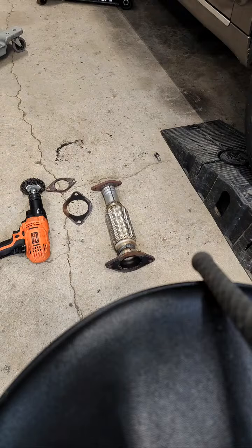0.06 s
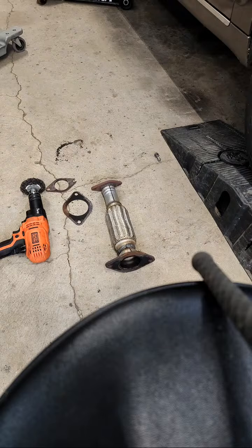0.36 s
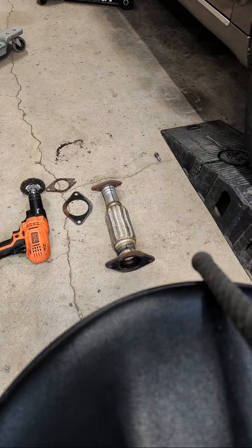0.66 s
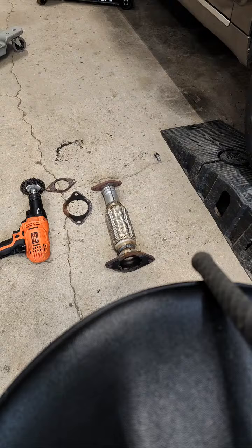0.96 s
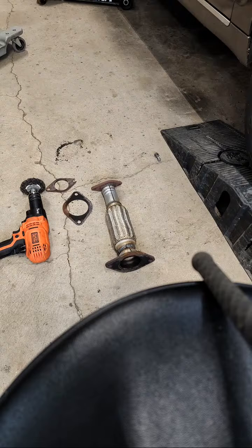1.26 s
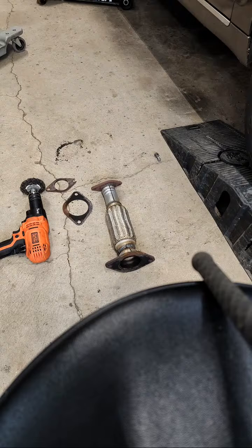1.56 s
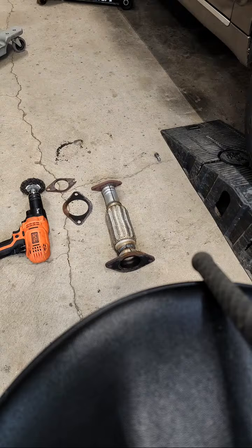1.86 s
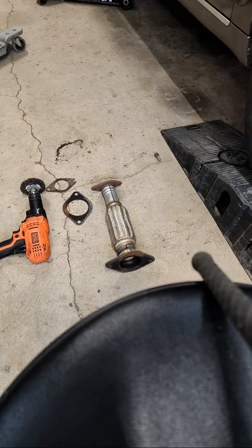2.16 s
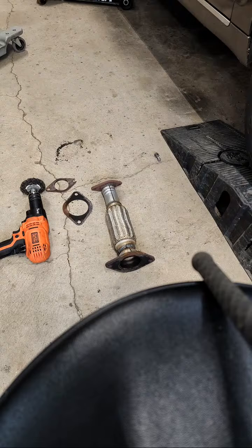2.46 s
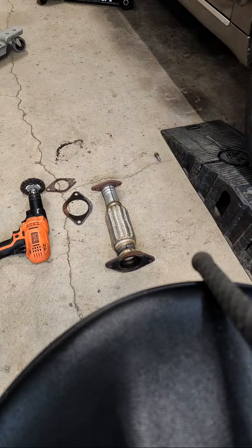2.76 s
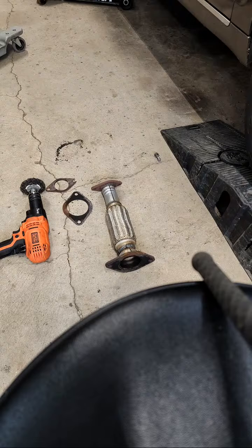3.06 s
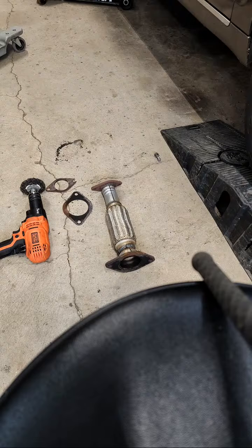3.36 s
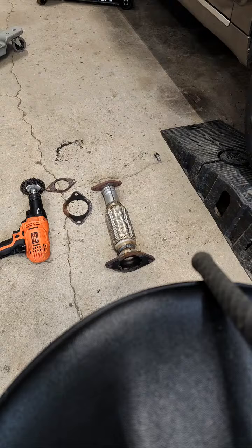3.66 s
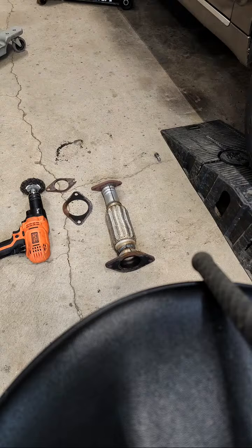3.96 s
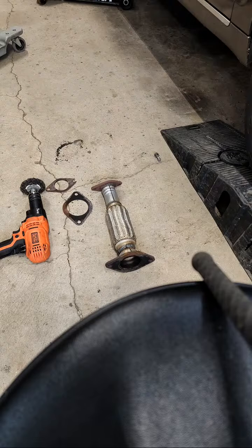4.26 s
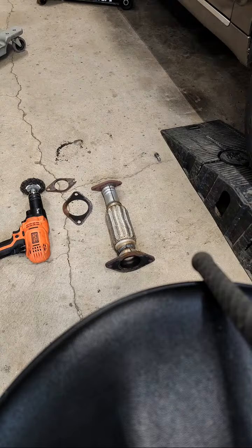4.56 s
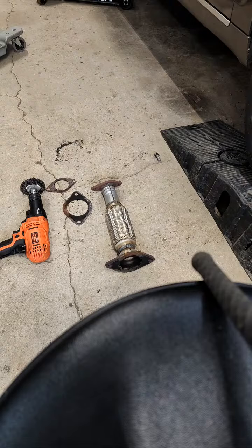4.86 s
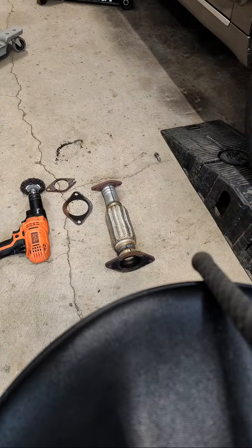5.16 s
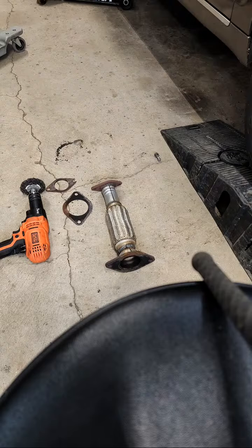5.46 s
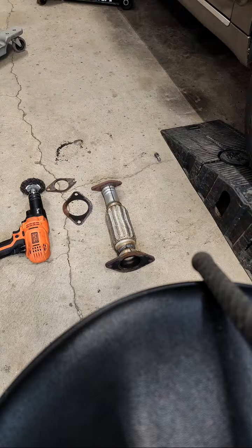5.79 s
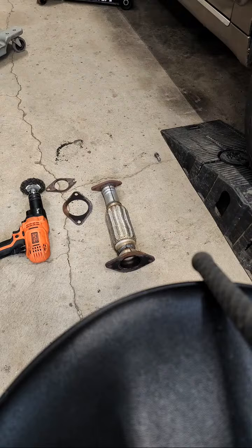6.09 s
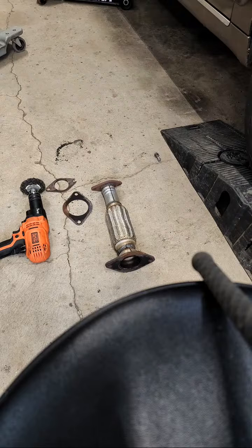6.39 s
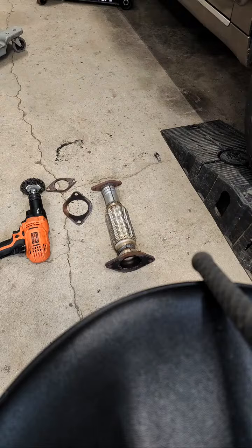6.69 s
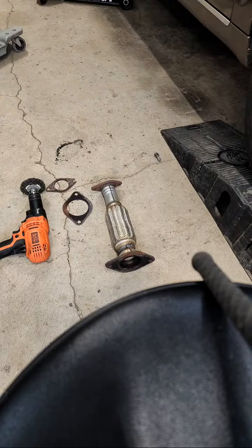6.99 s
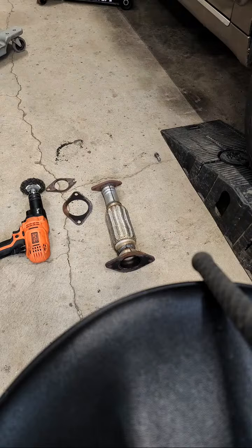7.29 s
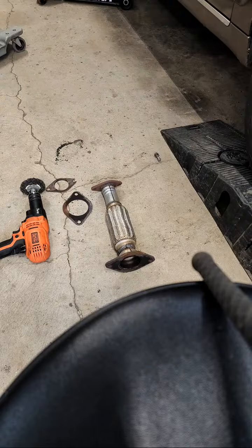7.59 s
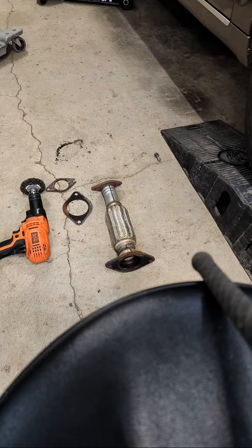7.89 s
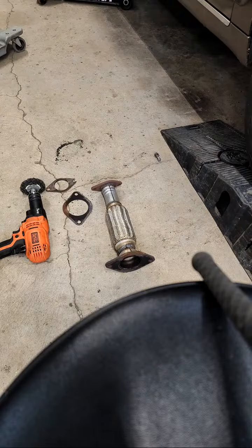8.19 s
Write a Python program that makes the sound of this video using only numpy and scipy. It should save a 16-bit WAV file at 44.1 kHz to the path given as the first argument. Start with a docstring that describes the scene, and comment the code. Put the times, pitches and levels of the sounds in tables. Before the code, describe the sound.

Soft rustles and scrapes of a cord dragged over concrete run under crisp little ticks, heard close with bright treble. Plastic clacks and knocks come in bunches as a power tool and other things are moved and set down, strongest around the middle. Sliding and light tapping continue, followed by one low thump. The harder blows ring briefly in the bare garage, over a faint, low motor hum.

```python
"""A garage with a concrete floor, where someone sorts out a power tool and its cord.
Cord and clothing slide with stick-slip friction, and cord and plug tick in light impacts.
Plastic housings clack as blows excite their modes; other things are set down with knocks and taps.
The bare room reverberates after each blow, a motor hums faintly, and the microphone lifts the treble."""
import sys
import numpy as np
from scipy import signal
from scipy.fft import rfft, irfft, next_fast_len
from scipy.io import wavfile

SR = 44100
rng = np.random.default_rng(int(sys.argv[2]) if len(sys.argv) > 2 else 0)


def to_wav(sig):
    """Store sig (one row per channel, or 1-D mono) as 16-bit WAV at the path in sys.argv[1].

    Samples outside -1..1 are clipped; the rate is SR.
    """
    pcm = np.clip(np.atleast_2d(sig), -1, 1) * 32767
    pcm = np.round(pcm).astype(np.int16)
    wavfile.write(sys.argv[1], SR, pcm.T)  # frames by channels


N = 371905
TIME = np.arange(N) / SR
KNOCK_STRIKE = 0.73   # share of a sudden knock's energy in its first clean strike

# Bright hiss of friction and grit, including the microphone's treble lift.
# Each row: frequency in Hz, relative density in dB.
HISS_SPECTRUM = [(2500, -77), (3200, -44.5), (3800, -19), (7000, -16), (7700, -16.5), (8200, -7.5),
                 (9300, -11), (10700, -2.5), (11900, 6), (13000, 7), (14200, 5.5), (15400, 5.5),
                 (16500, -43)]


def from_db(db):
    """Amplitude ratio of a level in decibels."""
    return 10 ** (np.asarray(db) / 20)


def rms_one(x):
    """Normalisation to unit rms."""
    return x / np.sqrt(np.mean(x ** 2) + 1e-20)


def in_time(rows):
    """Linear interpolation of each column at every sample; rows begin with a time in seconds."""
    times, *columns = np.transpose(rows)
    return [np.interp(TIME, times, column) for column in columns]


def at_hz(points, hz):
    """Interpolation on a logarithmic frequency axis."""
    known_hz, values = np.transpose(points)
    return np.interp(np.log(np.maximum(hz, 1)), np.log(known_hz), values)


def drift(rate):
    """Random modulation: straight lines join `rate` Gaussian values a second."""
    knots = rng.standard_normal(N // 20)
    return np.interp(TIME * rate, np.arange(len(knots)), knots)


def colour(x, spectrum):
    """Minimum-phase filtering that preserves the power of white noise."""
    size = next_fast_len(N + SR // 4) // 2 * 2
    hz = np.arange(size // 2 + 1) * SR / size
    gain = rms_one(from_db(at_hz(spectrum, hz)))
    cepstrum = irfft(np.log(gain))
    cepstrum[1:size // 2] *= 2   # folding the cepstrum makes the filter causal
    cepstrum[size // 2 + 1:] = 0
    return irfft(rfft(x, size) * np.exp(rfft(cepstrum)))[:N]


def swell(t, start, rise, release):
    """Envelope of a stroke: it gathers speed, then falls ever faster, by 24 dB in the release time."""
    age = t - start
    attack = np.sin(np.pi / 2 * np.clip(age / rise, 0, 1)) ** 2
    fall = np.clip((age - rise) / release, 0, 5)
    return attack * from_db(-24 * fall ** 1.24)


def friction(per_s, spread_db, jerk_db):
    """Stick-slip friction: random impulses of uneven size, modulated by the jerks of the hand."""
    slips = (rng.random(N) < per_s / SR) * rng.choice([-1, 1], N)
    sizes = from_db(spread_db * np.minimum(rng.exponential(1, N), 5))
    return rms_one(slips * sizes * from_db(jerk_db * drift(70)))


def sliding():
    """Friction of cord and cloth drags, scrapes and hisses; the strokes are incoherent and add in power."""
    # Strokes over the floor. Each row: start, rise and release in seconds,
    # then relative levels of drag, scrape and hiss in dB.
    strokes = [(-0.03, 0.067, 0.33, -66, -66, -43.5), (0.26, 0.086, 0.24, -81, -82, -49),
               (0.47, 0.19, 0.85, -72, -74.5, -49.5), (0.75, .06, 0.37, -61.5, -67, -47),
               (1.06, 0.17, 0.29, -72, -75.5, -52), (1.33, 0.062, 0.19, -73, -80.5, -59),
               (1.53, 0.074, 1, -77.5, -102, -59.5), (1.66, 0.29, .2, -77, -89, -54),
               (1.98, 0.017, 0.47, -55, -62.5, -45.5), (2.202, 0.19, 0.22, -57, -55, -36),
               (2.57, 0.036, 0.17, -62, -64.5, -45), (2.92, 0.031, .3, -75.5, -95, -71),
               (3.03, 0.25, 0.84, -75, -89, -49.5), (3.22, 0.26, .2, -60, -71, -36),
               (3.6, 0.15, 0.61, -63, -73, -63), (3.85, 0.069, 0.77, -80, -73, -49),
               (4.05, 0.049, 0.29, -65, -76.5, -51.5), (4.195, 0.022, 0.22, -59, -52.5, -31.5),
               (4.27, 0.072, 0.5, -51, -58.5, -38), (4.88, 0.057, 1, -73, -73.5, -47),
               (5.08, 0.09, 0.21, -62.5, -68, -45.5), (5.25, 0.04, 0.41, -68, -74.5, -47),
               (5.38, 0.1, 0.96, -80, -75.5, -45), (5.519, .08, 0.9, -64, -66.5, -36),
               (5.62, 0.1, 0.27, -50, -52.5, -35), (5.85, 0.053, 0.49, -59, -60.5, -41),
               (5.98, 0.094, 0.27, -52.5, -58.5, -40.5), (6.11, 0.082, .52, -60, -61.5, -37),
               (6.48, .04, 0.23, -54, -67, -41.5), (6.55, 0.028, 0.095, -59, -69, -39.5),
               (6.69, 0.014, 0.21, -57, -74, -43.5), (6.79, 0.14, 0.66, -56, -63, -49),
               (7.04, 0.21, 0.38, -61, -63, -49.5), (7.451, 0.05, 0.99, -63.5, -74.5, -44.5),
               (7.649, 0.12, 1, -61, -65.5, -43), (7.83, 0.045, 0.11, -58, -64, -49),
               (8.118, .1, 0.3, -78.5, -70, -39)]
    # Spectra of dull drag and gritty scrape. Each row: frequency in Hz, relative density in dB.
    drag_spectrum = [(150, -16), (260, 5), (380, 1), (650, -3.5), (900, -15), (1500, -28), (3000, -45)]
    scrape_spectrum = [(400, -7.5), (900, -2), (1300, -3), (1900, 2.5), (2600, 1), (3600, 4.5), (5000, 2),
                       (7000, -2), (10000, -2), (16000, -26)]
    t = TIME[::64]
    power = sum(np.outer(swell(t, start, rise, release), from_db(levels_db)) ** 2
                for start, rise, release, *levels_db in strokes)
    drag_gain, scrape_gain, hiss_gain = in_time(np.column_stack([t, np.sqrt(power)]))
    drag = drag_gain * colour(friction(per_s=2500, spread_db=2.5, jerk_db=3.5), drag_spectrum)
    scrape = scrape_gain * colour(friction(per_s=4000, spread_db=3.0, jerk_db=0.84), scrape_spectrum)
    hiss = hiss_gain * colour(friction(per_s=12000, spread_db=2.5, jerk_db=1.74), HISS_SPECTRUM)
    return from_db(-0.37) * drag + from_db(4.0) * scrape + from_db(-0.8) * hiss


def tone(hz, waver_hz, flutter_db):
    """A sine of unit rms under random frequency and amplitude modulation."""
    phase = 2 * np.pi * np.cumsum(hz + waver_hz * drift(6.5)) / SR
    return rms_one(np.sin(phase) * from_db(flutter_db * drift(9)))


def hum():
    """A motor's tone and its subharmonic, which beats with a close neighbour, over faint tones and air."""
    # Swell of the motor. Each row: time in seconds, main tone in dB, octave below in dB.
    motor_levels = [(0, -69, -79), (.33, -60, -60), (.5, -67.5, -77), (1.7, -70.5, -67.5), (2.4, -59, -64),
                    (2.75, -61, -72.5), (3.52, -51, -62.5), (3.75, -56, -63), (3.85, -73, -67),
                    (3.99, -59, -58), (4.7, -54, -69.5), (5.13, -52.5, -67), (5.24, -59.5, -73),
                    (5.73, -48, -63.5), (6.1, -55, -65.5), (7.65, -62, -77), (7.76, -59, -56.5),
                    (8.43, -58, -56)]
    # Faint lasting tones. Each row: frequency in Hz, level in dB.
    faint_tones = [(72, -69), (99, -83), (120, -66), (144, -72.5), (289, -75)]
    # Low rumble of the garage's still air. Each row: frequency in Hz, relative density in dB.
    air_spectrum = [(25, -34.5), (33, -13), (45, -3), (70, -2.5), (130, 3), (250, -4.5), (400, -15.5),
                    (700, -31), (1200, -29.5), (4000, -38), (8000, -31), (13000, -19.5), (16000, -23.5)]
    motor_hz, beat_hz = 191.4, 5.2
    main_db, low_db = in_time(motor_levels)
    motor = from_db(main_db) * tone(motor_hz, waver_hz=1.13, flutter_db=2.8)
    motor += from_db(low_db) * tone(motor_hz / 2, waver_hz=1.256, flutter_db=2.1)
    motor += from_db(-73.5) * tone(motor_hz / 2 + beat_hz, waver_hz=1.45, flutter_db=5.0)
    faint = sum(from_db(db) * tone(hz, waver_hz=1.61, flutter_db=4.5) for hz, db in faint_tones)
    air = from_db(-64.5) * colour(rng.standard_normal(N), air_spectrum)
    return motor + faint + air


def contacts(times, levels_db, lengths, strike=0):
    """Contact force: an impulse holds the energy share `strike`; a crunch peaks after each length."""
    out, age = np.zeros(N + SR), TIME[:SR // 6]
    for s, db, length in zip(times, levels_db, np.broadcast_to(lengths, len(times))):
        progress = age / length
        press = progress * np.exp(1 - progress)
        crunch = rms_one(rng.standard_normal(len(age)) * press)
        force = crunch * np.sqrt((1 - strike) * np.mean(press ** 2))
        force[0] += np.sqrt(strike * np.sum(press ** 2))
        start = round(s * SR)
        out[start:start + len(age)] += from_db(db) * force
    return out[:N]


def ring(x, hz, t60):
    """Damped resonance: a unit impulse starts a decaying sine of amplitude 1."""
    radius = np.exp(-np.log(1000) / (t60 * SR))
    angle = 2 * np.pi * hz / SR
    return signal.lfilter([0, np.sin(angle)], [1, -2 * radius * np.cos(angle), radius ** 2], x + 1e-18)


def clacks():
    """Impact excites modes: a housing hits the floor, its shell rings, its mass thumps, grit splashes."""
    # Plastic on concrete. Each row: time in seconds, relative levels of clack, thump and splash in dB.
    impacts = [(0.026, -57, -78, -60), (0.35, -57.5, -53, -61), (1.169, -68, -72, -54),
               (1.988, -61, -52, -50), (2.082, -50.5, -64, -32.5), (2.110, -37, -45, -39),
               (2.137, -40.5, -38.5, -23), (3.465, -41, -55, -44), (3.477, -43, -42.5, -26.5),
               (4.204, -56, -70, -28.5), (4.55, -36, -32.5, -19), (5.095, -60.5, -75, -54),
               (5.885, -54, -51, -60), (6.584, -47, -48, -41), (6.699, -55, -78, -43),
               (6.912, -45.5, -65, -31.5), (6.931, -40.5, -56, -30)]
    # Modes of the housing. Each row: frequency in Hz, relative level in dB, 60 dB decay time in seconds.
    modes = [(566, -31.5, 0.16), (733, -24.5, 0.084), (1410, -33, 0.056), (2000, -32, 0.068),
             (2540, -26, 0.015), (3560, -20, 0.015), (4280, -29, 0.022), (5230, -22, 0.012)]
    # Spectra of clack and thump. Each row: frequency in Hz, relative density in dB.
    clack_spectrum = [(200, 4.5), (450, -2.5), (900, -0.5), (1700, 0), (3000, 0.5), (6000, 3), (9000, 1),
                      (16000, -46)]
    thump_spectrum = [(28, -13), (45, -18), (70, 6), (100, -0.5), (170, 2.5), (280, 5), (420, -4),
                      (700, -11.5), (1500, -49)]
    times, clack_db, thump_db, splash_db = np.transpose(impacts)
    blow = contacts(times, clack_db + 0.5, lengths=0.0018, strike=0.93)
    shell = blow + sum(from_db(db - 8.5) * ring(blow, hz, t60) for hz, db, t60 in modes)
    thump = colour(contacts(times, thump_db - 5.0, lengths=0.0015, strike=KNOCK_STRIKE), thump_spectrum)
    splash = colour(contacts(times, splash_db - 1.0, lengths=0.0018), HISS_SPECTRUM)
    return colour(shell, clack_spectrum) + thump + splash


def knocks():
    """Bodies resonate in a band set by size and hardness; returns the direct sound and the room's feed."""
    # Things set down. Each row: time in seconds, relative level in dB,
    # lower and upper band edge in Hz, contact length in seconds.
    impacts = [(0.033, -62, 1080, 1490, .008), (0.741, -57.5, 270, 520, 0.0079),
               (0.779, -57, 2800, 4730, 0.0077), (0.876, -53, 260, 428, .005),
               (0.885, -53, 1500, 4000, .0009), (1.318, -60, 1500, 6000, 0.00079),
               (2.084, -46, 1700, 3800, .0014), (2.093, -38.5, 1700, 4000, .0008),
                (2.352, -37, 204, 355, 0.0037), (2.381, -37.5, 170, 1530, .0043),
               (2.404, -40.5, 180, 1000, 0.011), (4.3055, -24.5, 190, 3250, .0005),
               (4.331, -43, 200, 2340, 0.0024), (4.550, -45, 65, 130, 0.0064),
               (4.551, -43, 1410, 2080, 0.0086), (4.897, -58.5, 3770, 6500, 0.018),
               (5.092, -55, 600, 2700, 0.0013), (5.618, -47.5, 268, 453, 0.007), (6.042, -52, 50, 85, .012),
               (6.044, -46, 2740, 4440, 0.0076), (6.215, -46, 248, 1500, 0.0031),
               (6.278, -37, 2800, 4600, .0015), (6.281, -48, 272, 950, .0047),
               (6.341, -50, 253, 1210, 0.0042), (6.534, -49, 714, 4470, 0.0019),
               (6.653, -49.5, 900, 6000, 0.0013), (6.698, -46, 690, 4450, 0.0014),
               (6.742, -52.5, 610, 3000, 0.0013), (6.849, -52, 910, 6100, 0.0016),
               (6.935, -46, 448, 580, 0.0043), (7.305, -43, 2800, 8000, 0.00056),
               (7.725, -31, 70, 190, 0.0034), (7.727, -38.5, 240, 400, 0.0033),
               (7.729, -48.5, 396, 1070, 0.0032), (7.884, -53, 2500, 3650, 0.0057)]
    # Coupling to the room, weakest for small taps. Each row: lower band edge in Hz, gain in dB.
    room_coupling = [(80, -3), (250, 2.5), (900, 1), (2600, -5.5)]
    direct, to_room = np.zeros((2, N))
    for s, db, low_hz, high_hz, length in impacts:
        body = signal.butter(3, [low_hz, high_hz], "band", fs=SR, output="sos")
        strike = KNOCK_STRIKE * np.exp(-length / 0.0044)   # slow touches have almost no strike
        blow = contacts([s], [db - 2.0], length, strike)
        sound = rms_one(signal.sosfilt(body, blow + 1e-18)) * np.std(blow)
        direct += sound
        to_room += from_db(at_hz(room_coupling, low_hz)) * sound
    return direct, to_room


def ticks():
    """Brief, hard impacts of cord and plug, heard very bright through the microphone's treble peak."""
    # Light touches. Each row: time in seconds, relative level in dB, contact length in seconds.
    touches = [(0.154, -23.5, 0.0011), (0.604, -32, 0.00079), (0.683, -39, .0007), (0.712, -29.5, 0.0011),
               (0.884, -32, 0.0032), (1.318, -37, .0007), (1.986, -24, 0.0012), (2.049, -27, .001),
               (2.063, -22, .0009), (2.110, -14.5, 0.0023), (2.136, -8, 0.0018), (2.428, -19.5, .0007),
               (2.998, -43, .001), (3.461, -9, 0.00037), (3.467, -12.5, 0.0018), (3.477, 1, 0.00025),
               (3.864, -35.5, 0.0027), (3.952, -21.5, .0012), (3.984, -30, .001), (4.022, -30.5, .0012),
               (4.306, -17.5, 0.0027), (4.546, -7.5, 0.0019), (4.899, -26, 0.0018), (5.924, -16, 0.0024),
               (5.98, -16, .0005), (6.403, -24.5, 0.0013), (6.649, -26.5, .0015), (6.696, -24, 0.00096),
               (6.909, -18, .0006), (6.926, -9.5, 0.00035), (7.305, -15.5, 0.00063), (8.222, -17, .0007)]
    # A tick as heard through the microphone's treble peak.
    # Each row: frequency in Hz, relative density in dB.
    heard_spectrum = [(500, -58), (2500, -20.5), (7000, -17.5), (8500, -3), (10500, -1), (12000, 14.5),
                      (14000, 1.5), (15500, 16.5), (16500, -41)]
    times, levels_db, lengths = np.transpose(touches)
    return colour(contacts(times, levels_db - 10.5, lengths, strike=0.2), heard_spectrum)


def reverberation(x):
    """Diffuse field: each band stores the energy fed to it and returns it as decaying noise."""
    # Decay of the bare garage. Each row: frequency in Hz, reverberation time in seconds.
    decay_times = [(80, 0.082), (300, 0.46), (1000, 0.56), (3000, 0.66), (7000, 0.56), (13000, 0.33)]
    build_up_s = 0.002
    build = np.exp(-1 / (build_up_s * SR))
    out, white = np.zeros(N), rng.standard_normal((2, N))
    edges_hz = np.geomspace(450, 17000, 29) - 400
    for k, (low, high) in enumerate(zip(edges_hz, edges_hz[1:])):
        band = signal.butter(3, [low, high], "band", fs=SR, output="sos")
        t60 = at_hz(decay_times, np.sqrt(low * high))
        keep = np.exp(-np.log(1e6) / (t60 * SR))   # share of energy left after one sample
        power = signal.sosfilt(band, x) ** 2
        stored = signal.lfilter([(1 - keep) * (1 - build)], [1, -keep - build, keep * build], power)
        out += np.sqrt(np.maximum(stored, 0)) * rms_one(signal.sosfilt(band, white[k % 2]))
    return out


def scene():
    """Direct and diffuse sound add, alike in both channels: close touches stay dry, blows fill the room."""
    slide, tick, clack = sliding(), ticks(), clacks()
    knock, knock_to_room = knocks()
    into_room = from_db(-25.5) * slide + from_db(-31.0) * tick + from_db(5.0) * clack + knock_to_room
    mono = slide + tick + clack + knock + reverberation(into_room) + hum()
    return np.array([mono, mono])


def record(dry):
    """Band limiting: the deepest rumble is rolled off and the extreme treble is cut steeply."""
    low_hz, high_hz = 36, 16200
    high_pass = signal.butter(4, low_hz, "high", fs=SR, output="sos")
    low_pass = signal.ellip(10, .2, 70, high_hz, fs=SR, output="sos")
    return signal.sosfilt(low_pass, signal.sosfilt(high_pass, dry))


dry = scene()
out = record(dry)
to_wav(out)
```